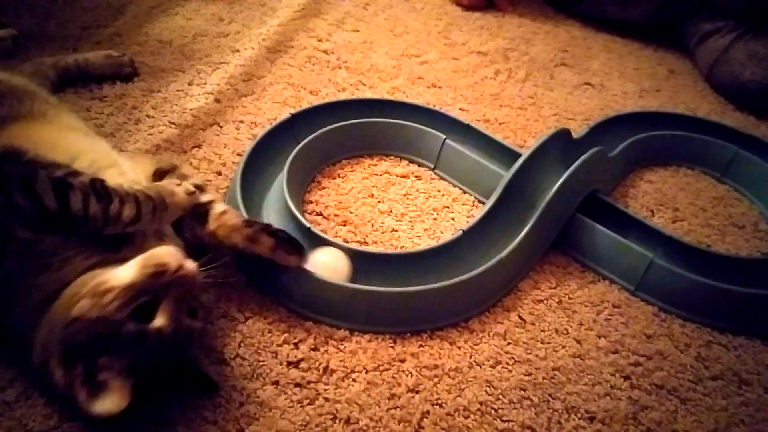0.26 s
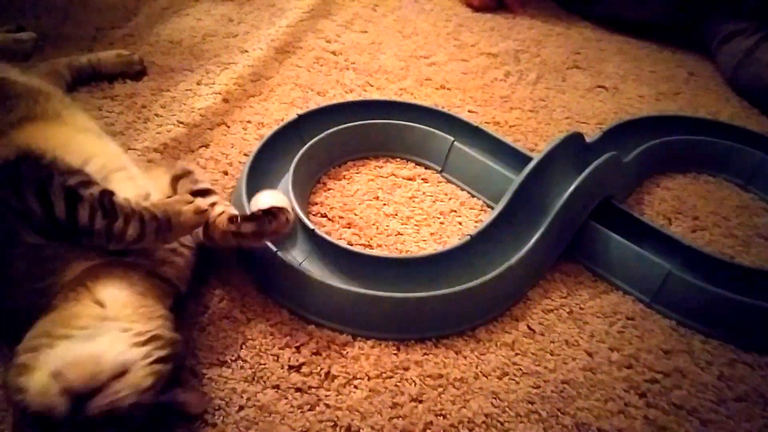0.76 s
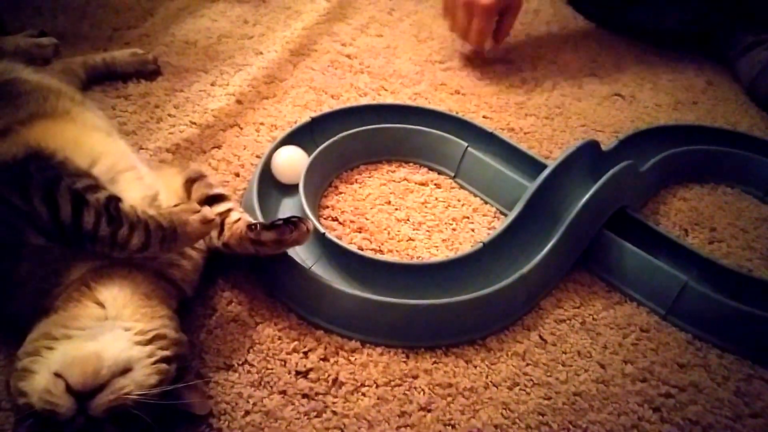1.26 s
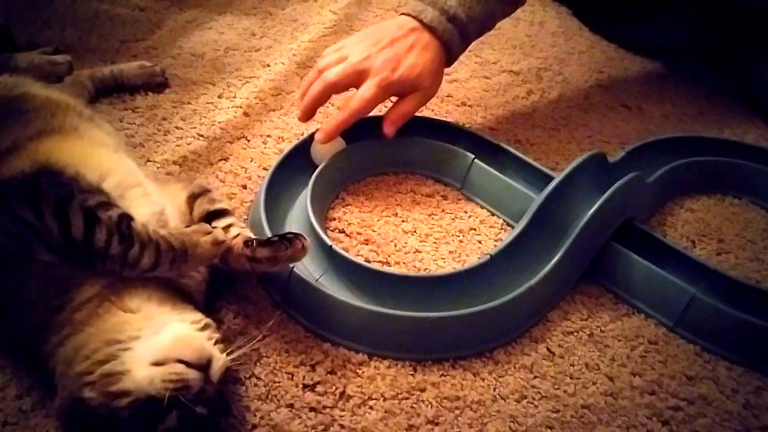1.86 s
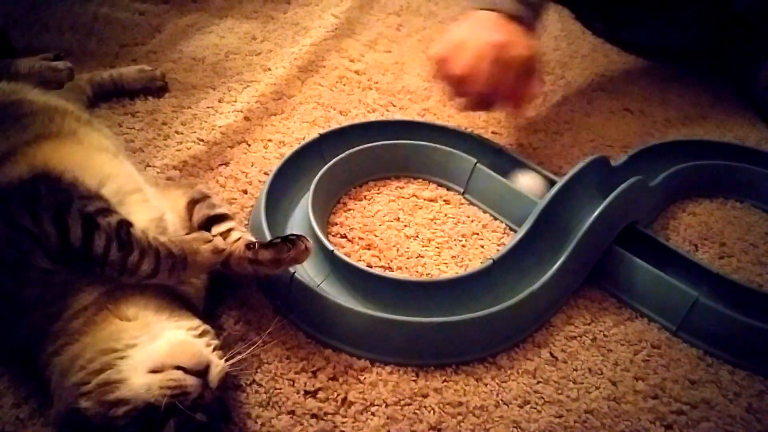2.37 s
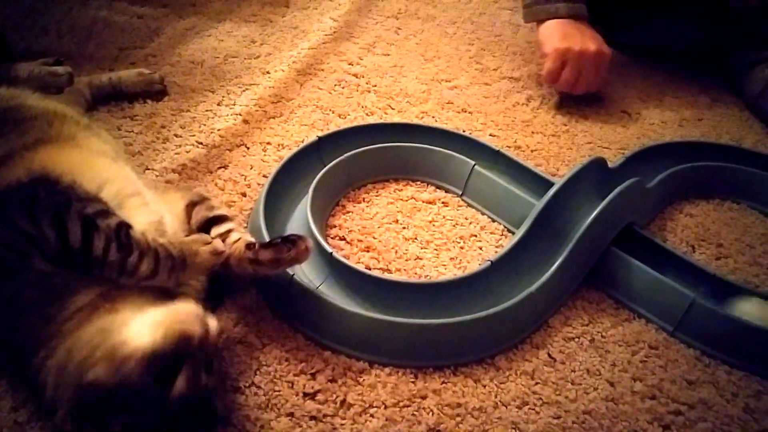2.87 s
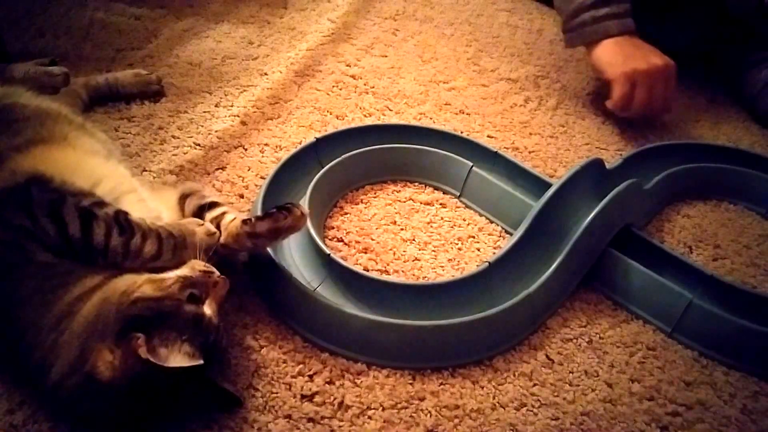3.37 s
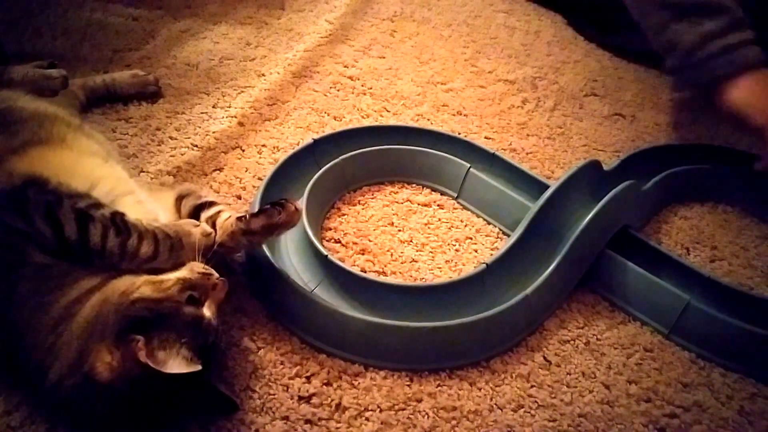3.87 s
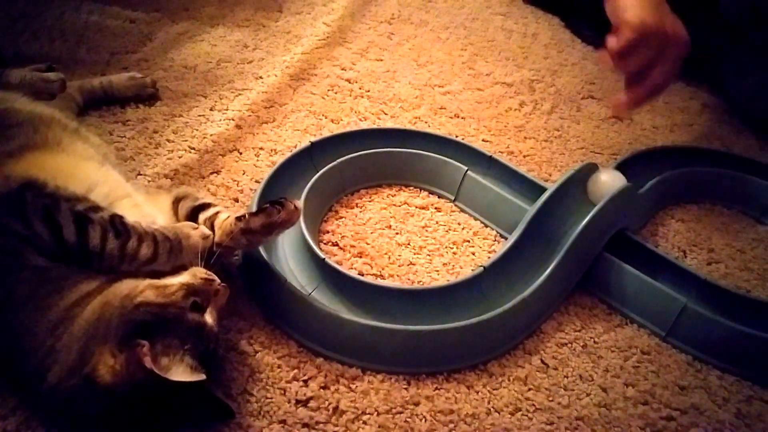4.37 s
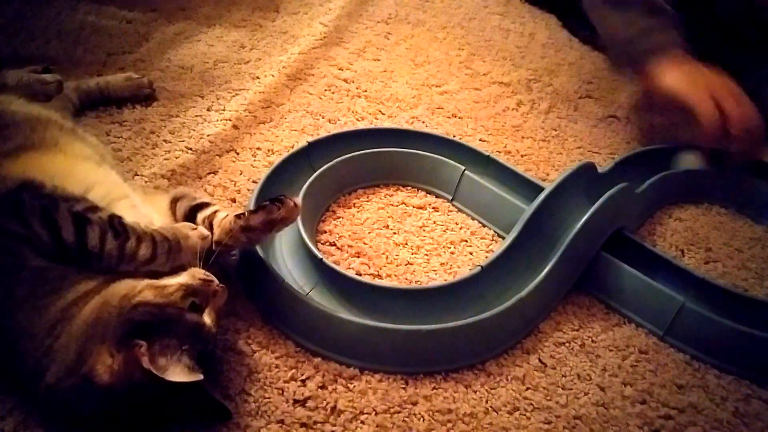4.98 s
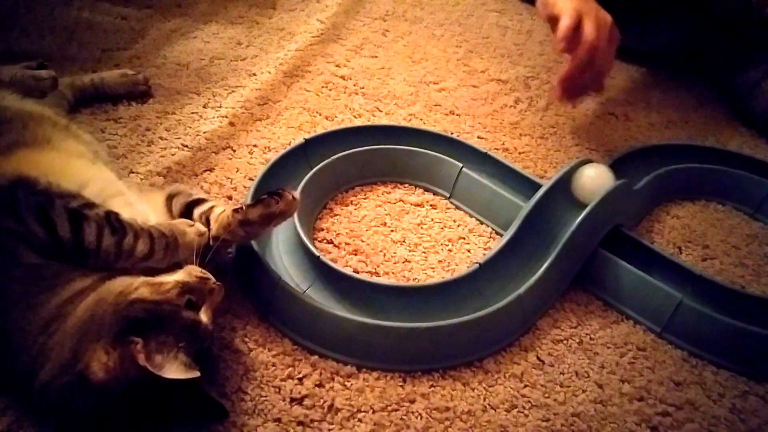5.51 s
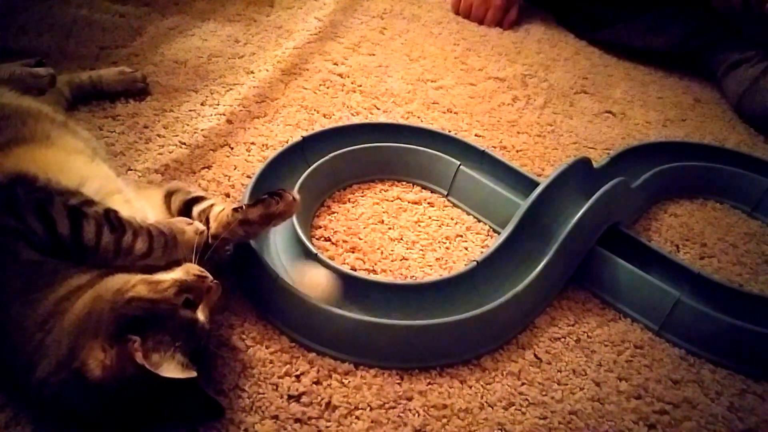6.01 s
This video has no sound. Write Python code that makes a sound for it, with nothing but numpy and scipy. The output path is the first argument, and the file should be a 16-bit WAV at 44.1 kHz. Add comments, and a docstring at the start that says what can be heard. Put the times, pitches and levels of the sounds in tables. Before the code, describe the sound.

A light hollow ball rattles and rumbles around a plastic track on carpet, with quiet gaps and sharp knocks, in a quiet softly hissing room.

```python
"""You hear sharp knocks, rattles and rumbling: a light hollow ball runs round a plastic track on a carpet.
Knocks on walls and joints ring the track and the ball's shell; rolling touches make the rumble.
A hand scuffs track and carpet when it flicks the ball: friction noise that swells and fades.
Behind it is a quiet room with a low hum, heard through two microphone ports, the left one hissier."""
import sys
import numpy as np
from scipy import signal
from scipy.fft import rfft, irfft, next_fast_len
from scipy.io import wavfile
from scipy.ndimage import uniform_filter1d

SR = 44100
rng = np.random.default_rng(int(sys.argv[2]) if len(sys.argv) > 2 else 0)


def wav_out(sig):
    """Save sig, one row per channel (or a flat mono array), as 16-bit PCM at SR to the path in sys.argv[1]."""
    wavfile.write(sys.argv[1], SR, np.round(np.clip(np.atleast_2d(sig).T, -1, 1) * 32767).astype(np.int16))


N = 275625

# Ball hitting a wall or joint:
# (time [s], strength [dB], pitch of the spot struck [Hz], crack relative to strength [dB])
KNOCK_TABLE = [(0.042, -48, 760, -49), (0.063, -51, 786, -48), (0.146, -49, 750, -60),
               (0.161, -48, 736, -72), (0.395, -47.5, 590, -62), (0.422, -46.5, 653, -69),
               (0.448, -48.5, 890, -62), (0.534, -48, 634, -16), (0.586, -43.5, 664, -48),
               (0.74, -49, 576, -33), (0.769, -42.5, 630, -39), (0.821, -50, 660, -83),
               (1.003, -50, 676, -32), (1.032, -45.5, 646, -38), (1.051, -40, 650, -45),
               (1.15, -50, 670, -37), (1.172, -43, 655, -52), (1.235, -50.5, 456, -63),
               (1.628, -47, 717, -44), (1.995, -39.5, 770, -6.5), (2.023, -29.5, 606, -17.5),
               (2.068, -35.5, 1150, -16.5), (2.16, -30, 670, -21), (2.207, -25, 900, -25),
               (2.215, -37, 800, -22), (2.257, -38, 1090, -23), (2.297, -28.5, 970, -17),
               (2.308, -28.5, 1010, -28), (2.321, -30, 1000, -21), (2.348, -25.5, 1060, -17),
               (2.386, -26, 1060, -26.5), (2.421, -26, 570, -32), (2.439, -27, 573, -29),
               (2.482, -29.5, 610, -37), (2.587, -29.5, 600, -65), (2.618, -35.5, 790, -58),
               (2.64, -32.5, 645, -77), (2.653, -36, 790, -60), (2.689, -37, 634, -76),
               (2.763, -31, 610, -34), (2.787, -35, 610, -71), (2.866, -46, 1950, -12),
               (2.883, -41.5, 1560, -14), (2.896, -33.5, 487, -17.5), (2.956, -38, 614.5, -22),
               (2.978, -32, 457, -29), (3.075, -34.5, 880, -24), (3.146, -36, 505, -19.5),
               (3.267, -41.5, 570, -30), (3.342, -51, 1060, -3.5), (3.38, -32.5, 614, -3),
               (3.641, -32.5, 1940, -10.5), (3.657, -38.5, 1960, -7.5), (3.947, -47, 862.4, -11),
               (3.992, -34.5, 1150, -6.5), (4.22, -35, 805, -12), (4.232, -30, 800, -9),
               (4.345, -25, 1180, -26), (4.353, -28, 1550, -8), (4.357, -34, 1180, 6.5),
               (4.38, -36, 640, -46), (4.895, -30.5, 710, -10), (4.94, -30, 1157, -25),
               (4.959, -37, 1110, -2), (5.051, -31, 750, -12.5), (5.062, -25.5, 825, -21),
               (5.078, -14, 1220, -8), (5.09, -19.5, 770, -9), (5.098, -27, 1130, -32),
               (5.121, -21, 2300, -3.5), (5.167, -23, 776, -10.5), (5.447, -32, 970, 3.5),
               (5.468, -19.5, 1204, -29), (5.747, -36.5, 1200, -28), (5.766, -40, 1120, -22),
               (5.805, -29.5, 1310, -16), (5.819, -22.5, 1220, -17.5), (5.848, -23, 1260, -31.5),
               (5.88, -28, 765, -11), (5.908, -32.5, 430, -18), (5.927, -34.5, 1740, -5),
               (6.002, -47, 1776, 2.5), (6.142, -36.5, 1010, -3.5), (6.157, -25, 1230, -17.5),
               (6.173, -28, 1050, -12.5), (6.198, -30.5, 724, -13.5)]
# Ways the plastic track can ring, its modes:
# (pitch [Hz], relative level [dB], time to fade by 60 dB [s])
TRACK_MODES = [(257.3, -8.5, 0.072), (319.5, -4.5, 0.055), (405.4, -1.5, 0.044), (596, -7, 0.057),
               (705, -5.5, 0.042), (742, -14, 0.1), (848, 1.5, 0.015), (993, 1, 0.017), (1192, 2.5, 0.019),
               (1585, 0.5, 0.0098), (1847, -1.5, 0.017), (2215, -1.5, 0.014), (3165, -2, 0.005)]
# Spurts of rolling: (start [s], fullest [s], held until [s], rumble level [dB],
# pitch of the stretch of track under the ball [Hz])
ROLL_SPURTS = [ (1.97, 2.028, 2.07, -50, 507), (2.075, 2.167, 2.31, -45.5, 620),
               (2.4, 2.554, 2.69, -50.5, 574), (2.63, 2.835, 2.95, -48.5, 400),
               (3.044, 3.082, 3.165, -53, 533), (3.1, 3.397, 3.52, -57, 564),
               (3.62, 3.636, 3.695, -59.5, 794), (3.922, 3.969, 4.01, -51.5, 1050),
               (4.052, 4.385, 4.384, -38, 646), (4.816, 4.848, 4.945, -41.5, 710),
               (4.96, 5.077, 5.16, -42.5, 870), (5.178, 5.471, 5.504, -39, 754),
               (5.791, 5.823, 5.9, -39.5, 560), (5.8, 6.007, 6.18, -46.5, 400)]

THUMP_HZ = 480   # track modes below this are the low, thumping ones


def knocks(away_db, thump_db, hard_share, neutral_crack_db, spread_db, side_db, blow_db):
    """Each knock thumps the low modes and rings those near the pitch of the spot, a little unlike at each port."""
    bright_hz = 1000
    rebound_s, rebound_db = 0.0035, -15   # shortest wait; level before a chance factor
    time_s, strength_db, spot_hz, crack_db = np.transpose(KNOCK_TABLE)
    at = np.round(time_s * SR).astype(int)
    chance = rng.standard_normal((len(time_s), len(TRACK_MODES), 3))
    waits = 1 + np.cumsum(rng.random((len(time_s), 2)), axis=1)
    rebounds = (rebound_s * SR * waits ** 2).astype(int).T
    out = np.zeros((2, N))
    for k, (hz, level_db, t60) in enumerate(TRACK_MODES):
        reach_db = away_db * np.abs(np.log2(hz / spot_hz))   # fainter with each octave from the spot
        if hz < THUMP_HZ:
            reach_db = thump_db + reach_db / 2
        octaves_up = max(np.log2(hz / bright_hz), 0)
        hard_db = hard_share * (crack_db - neutral_crack_db) * octaves_up   # soft blows miss the high modes
        chance_db = spread_db * chance[:, k, 0]
        port_db = side_db * (hz > THUMP_HZ) * chance[:, k, 1:].T
        clicks = np.zeros((2, N))
        clicks[:, at] = from_db(strength_db + blow_db + level_db + reach_db + hard_db + chance_db + port_db)
        for late in rebounds:   # the light ball rattles back, much weaker than the knock, by varying amounts
            clicks[:, at + late] += from_db(rebound_db) * clicks[:, at] * np.tanh(chance[:, k, 1])
        out += (-1) ** k * ring(clicks, hz, t60, contact=0.7)
    return out


def wall_rings():
    """The wall under each blow rings briefly at its own pitch: a sine that fades at a steady rate in dB."""
    fade_cycles, wall_db = 18.1, -3   # cycles to fade by 60 dB; level relative to the knock's strength
    out, t = np.zeros(N + SR), np.arange(SR // 20) / SR
    for time_s, strength_db, spot_hz, _ in KNOCK_TABLE:
        at = round(time_s * SR)
        fade = from_db(strength_db + wall_db - 60 * t * spot_hz / fade_cycles)
        onset = np.minimum(t * spot_hz, 1)   # swells over the first cycle
        out[at:at + len(t)] += fade * onset * np.sin(2 * np.pi * spot_hz * t)
    return out[:N]


def cracks(touches, t60, crack_db, tick_db):
    """The ball's thin shell answers each knock, and faintly each touch, with a short burst of bright noise."""
    # Resonances of the ball shell: (centre [Hz], width [Hz], relative level [dB])
    shell = [(6830, 3700, 3.5), (11600, 90000, -13.5)]
    time_s, strength_db, _, above_db = np.transpose(KNOCK_TABLE)
    clicks = np.abs(touches) * from_db(roll_db() + tick_db)
    clicks[np.round(time_s * SR).astype(int)] = from_db(strength_db + above_db + crack_db)
    fading = signal.lfilter([1], [1, -from_db(-60 / (t60 * SR))], clicks + 1e-18)
    burst = fading * rng.standard_normal((2, N))
    return sum(from_db(db) * resonance(burst, hz, width_hz) for hz, width_hz, db in shell)


def rumble(touches, away_db, hollow_db, wander_db):
    """The soft touches of rolling ring the modes near the pitch of the stretch under the ball."""
    _, fullest, held, _, pitch_hz = np.transpose(ROLL_SPURTS)
    spot_hz = np.interp(np.arange(N) / SR, (fullest + held) / 2, pitch_hz)
    out = np.zeros(N)
    for hz, level_db, t60 in TRACK_MODES:
        struck = rng.random(N) < 0.5   # each touch lands where only some modes move
        pushes = touches * struck
        if hz < THUMP_HZ:   # the low modes hum without a break, now one, now another
            hum_level = from_db(hollow_db + wander_db * drift(4.4))
            pushes = pushes + hum_level * rng.standard_normal(N)
        reach_db = away_db * np.abs(np.log2(hz / spot_hz))
        out += ring(pushes * from_db(level_db + reach_db), hz, t60, contact=0.01)
    # divide by the average loudness over a tenth of a second, so the spurts alone set the slow level
    local_rms = np.sqrt(uniform_filter1d(out ** 2, size=SR // 10) + 1e-20)
    return from_db(roll_db()) * out / local_rms


def chatter(per_s, size_spread, lumpy_db):
    """The ball chatters over the grain of the plastic: uneven touches that come in clumps."""
    sizes = from_db(size_spread * np.minimum(rng.exponential(1, N), 5))
    pushes = sizes * rng.choice([-1, 1], N)
    touch_chance = per_s * from_db(lumpy_db * drift(25)) / SR
    return pushes * (rng.random(N) < touch_chance)


def roll_db():
    """Rolling level in dB: the loudest spurt counts; between spurts the ball creeps at a fixed low level."""
    rise_db, fade_db_per_s, creep_db = 31, 164, -73.5   # gained from start to fullest; lost later; floor
    spurts = [in_time(*row[:4], rise_db, fade_db_per_s) for row in ROLL_SPURTS]
    return np.maximum(np.max(spurts, axis=0), creep_db)


def scuffs():
    """Skin sliding on track and carpet: bright friction noise, catching unevenly, swells and fades."""
    # Strokes of the hand: (start [s], fullest [s], held until [s], level [dB])
    strokes = [(4.146, 4.16, 4.2, -40.5), (4.225, 4.295, 4.32, -37), (4.32, 4.36, 4.44, -52),
               (5.066, 5.072, 5.17, -44), (5.3, 5.36, 5.428, -34.5)]
    # Tone of the friction noise: (frequency [Hz], relative level per Hz [dB])
    friction = [(600, -47), (1200, -17), (2000, -5.5), (5500, -7), (8400, 3.5), (16000, -13)]
    rise_db, fade_db_per_s, catch_db = 22, 550, 1.5
    swell = sum(from_db(in_time(*row, rise_db, fade_db_per_s)) for row in strokes)
    catching = from_db(catch_db * drift(70))
    even_sides = [(SR, 0)]
    return swell * catching * banded_noise(friction, even_sides, patchy_db=1.5, patch_rate=30.)


def background():
    """Room air and microphone hiss, with a faint wavering hum: all are noise, shaped by filters."""
    # Tone of the air: (frequency [Hz], relative level per Hz [dB])
    air_tone = [(50, -13.5), (166, -18.5), (400, -10), (520, -36), (690, -15), (1900, -29.5), (3500, -24),
                (5000, -25.5), (8500, -19.5), (16000, -29.5)]
    # Sides of the air: (frequency [Hz], left above right [dB])
    air_sides = [(700, 7), (2400, -2), (4400, 0), (8100, 8), (15000, 16.5)]
    # Wavering hum: (centre [Hz], width [Hz], level [dB])
    hum_bands = [(53.4, 15.6, -71), (165.8, 8.7, -74)]
    # Extra hiss in the left port: (centre [Hz], width of each of two filters [Hz], level [dB])
    left_hiss = (6450, 1680, -65)
    air_db = -69
    hum = 0
    for hz, width_hz, db in hum_bands:
        hum = hum + from_db(db) * rms_one(resonance(rng.standard_normal(N), hz, width_hz))
    hz, width_hz, db = left_hiss
    once = resonance(rng.standard_normal(N), hz, width_hz)
    hiss = from_db(db) * rms_one(resonance(once, hz, width_hz))
    air = from_db(air_db) * banded_noise(air_tone, air_sides, patchy_db=3.5, patch_rate=11.3)
    return air + hum + hiss * np.c_[[1, 0]]


def room(x):
    """Echoes, duller each round: eight feedback delays shared by both ports, eight that make them differ."""
    t60_s, wall_cut_hz, wide_hz = 0.14, 6500, 520   # fade by 60 dB; dulling; ports differ mainly above this
    out, dull = np.zeros((2, N)), np.exp(-2 * np.pi * wall_cut_hz / SR)
    lags = (rng.uniform(0.0066, 0.03, 16) * SR).astype(int)
    for k, lag in enumerate(lags):
        loop, state = x.copy(), [0.]
        gain = from_db(-60 * lag / SR / t60_s)
        for i in range(lag, N, lag):
            back, state = signal.lfilter([gain * (1 - dull)], [1, -dull], loop[i - lag:i], zi=state)
            loop[i:i + lag] += back[:N - i]
        out[k % 2] += (loop - x) * (-1) ** (k // 2)
    shared, differing = out
    return shared + high_pass(differing, wide_hz) * np.c_[[1, -1]]   # long waves reach both ports alike


def ports(x):
    """The casing shades and delays near sounds differently at the two ports."""
    # Level of near sounds: (frequency [Hz], left above right [dB])
    near_sides = [(400, 0), (1300, -6.5), (2400, -14.5), (4400, -4), (15000, 1.5)]
    # Timing of near sounds: (frequency [Hz], phase by which left leads [radians])
    near_phase = [(0, -1.5), (430, -0.02), (780, -0.85), (2070, -2), (4700, -1), (8100, -12), (16000, -13)]
    size = next_fast_len(N + SR // 10)
    hz = np.arange(size // 2 + 1) * SR / size
    tilt = from_db(at_hz(near_sides, hz + 1) / 2)
    lead = np.exp(1j * np.interp(hz, *np.transpose(near_phase)))
    return irfft(rfft(x, size) * [tilt * lead, 1 / tilt], size)[:, :N]


def from_db(db):
    """Turn decibels into a plain factor."""
    return 10 ** (np.asarray(db) / 20)


def rms_one(x):
    """Scale a sound to an average (rms) strength of 1."""
    return x / np.sqrt(np.mean(x ** 2) + 1e-20)


def in_time(start, fullest, held, db, rise_db, fade_db_per_s):
    """Level in dB of one movement: it rises, holds, then fades at a steady rate."""
    t = np.arange(N) / SR
    rise = rise_db * np.maximum(fullest - t, 0) / (fullest - start)
    fade = fade_db_per_s * np.maximum(t - held, 0)
    return db - rise - fade


def at_hz(points, hz):
    """Read a frequency table between its points, on a logarithmic pitch scale."""
    table = np.array(points)
    return np.interp(np.log(hz), np.log(table[:, 0]), table[:, 1])


def drift(rate):
    """Slow random wandering of spread 1: noise smoothed at the given rate in Hz."""
    step = 40   # samples between the points of the slow curve
    r = np.exp(-2 * np.pi * rate * step / SR)
    noise = rng.standard_normal(N // step + 2002)
    slow = signal.lfilter([1], [1, -2 * r, r * r], noise)[2000:]   # skip the filter's start-up
    return np.interp(np.arange(N) / step, np.arange(len(slow)), rms_one(slow))


def ring(clicks, hz, t60, contact):
    """A click sets a sine ringing; the contact lasts a part of a cycle, which dulls the onset."""
    r, w = from_db(-60 / (t60 * SR)), 2 * np.pi * hz / SR
    soft = np.exp(-w / contact)   # contact is in radians of the cycle
    pushes = signal.lfilter([(1 - soft) ** 2], [1, -2 * soft, soft ** 2], clicks + 1e-18)
    return signal.lfilter([0, np.sin(w)], [1, -2 * r * np.cos(w), r * r], pushes)


def resonance(x, hz, width_hz):
    """Favour one band of frequencies, with gain 1 at its top."""
    r = np.exp(-np.pi * width_hz / SR)
    poles = [1, -2 * r * np.cos(2 * np.pi * hz / SR), r * r]
    return signal.lfilter([(1 - r * r) / 2, 0, (r * r - 1) / 2], poles, x)


def banded_noise(spectrum, balance, patchy_db, patch_rate):
    """Third-octave noise bands, unrelated at the two ports, each with its level, flicker and side; rms 1."""
    out, edges = 0, 30 * 2 ** np.arange(0, 9.4, 1 / 3)
    white = rng.standard_normal((2, 2, N))   # neighbouring bands get unrelated noise
    for k, (low, high) in enumerate(zip(edges, edges[1:])):
        band_filter = signal.butter(2, [low, high], "band", fs=SR, output="sos")
        band = signal.sosfilt(band_filter, white[k % 2])
        hz = np.sqrt(low * high)
        side_db = at_hz(balance, hz) / 2 * np.c_[[1, -1]]
        out = out + band * from_db(at_hz(spectrum, hz) + patchy_db * drift(patch_rate) + side_db)
    return rms_one(out)


def high_pass(x, hz):
    """Weaken everything below the given frequency."""
    return signal.sosfilt(signal.butter(2, hz, "high", fs=SR, output="sos"), x)


def scene():
    """Toy and hand heard near, through the ports and the room, over the background."""
    track_low_hz, room_db = 121, -14.5
    touches = chatter(per_s=1200., size_spread=3.55, lumpy_db=3.)
    toy = knocks(away_db=-5.5, thump_db=-1.0, hard_share=0.45, neutral_crack_db=-21.0,
                 spread_db=2.5, side_db=4.0, blow_db=-2.5)
    toy += wall_rings()
    toy += cracks(touches, t60=0.016, crack_db=4.0, tick_db=-28.)
    toy += rumble(touches, away_db=-10.5, hollow_db=-17.0, wander_db=6.5)
    radiated = high_pass(high_pass(toy, track_low_hz), track_low_hz)   # a small track radiates little bass
    near = radiated + scuffs()
    return ports(near) + from_db(room_db) * room(near.mean(axis=0)) + background()


def record(dry):
    """The microphone drops the deepest bass; the top is cut."""
    mic_low_hz, cutoff_hz = 41.4, 15750
    bass_cut = high_pass(high_pass(dry, mic_low_hz), mic_low_hz)
    top_cut = signal.ellip(12, 0.5, 75, cutoff_hz, fs=SR, output="sos")
    return signal.sosfilt(top_cut, bass_cut)


dry = scene()
out = record(dry)
wav_out(out)
```